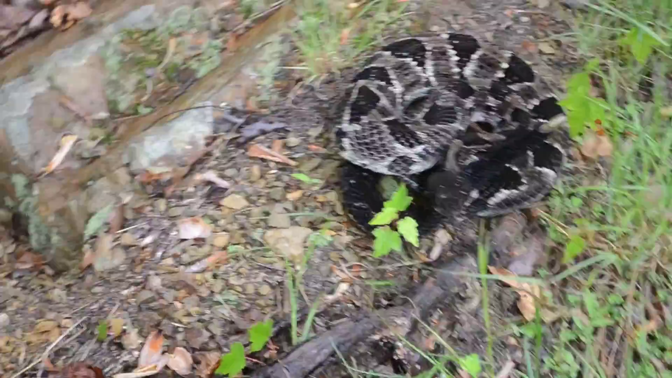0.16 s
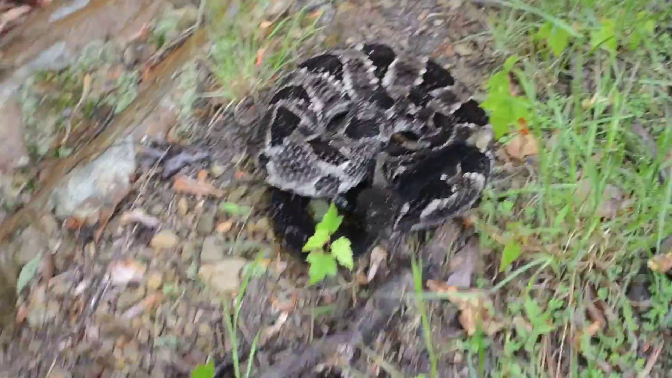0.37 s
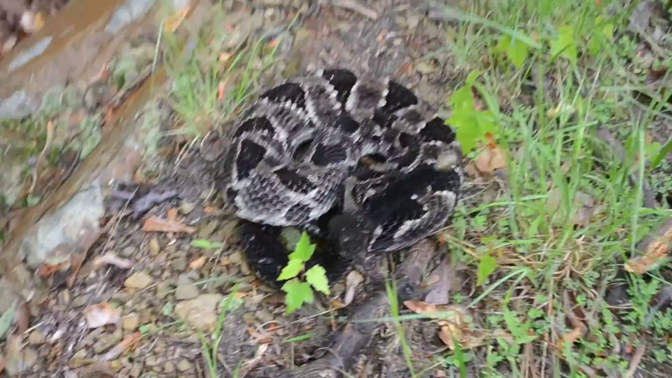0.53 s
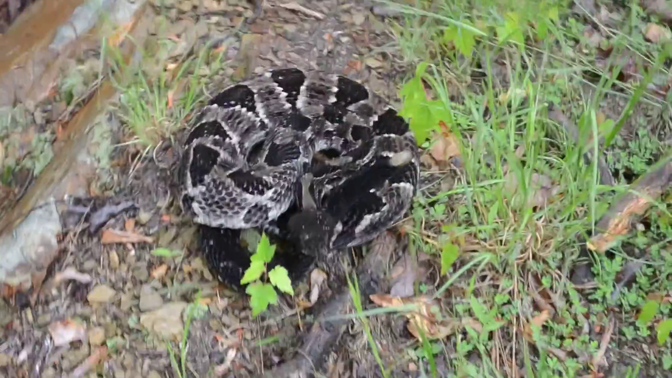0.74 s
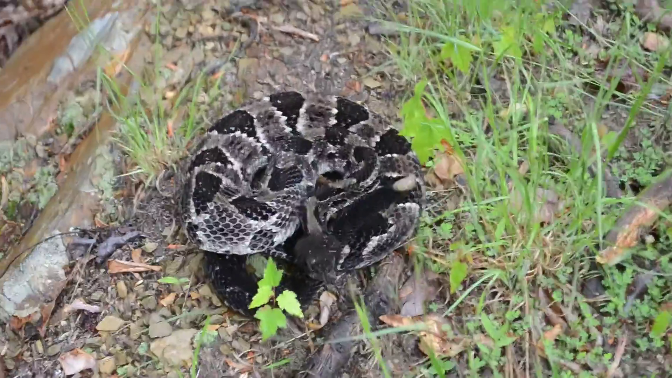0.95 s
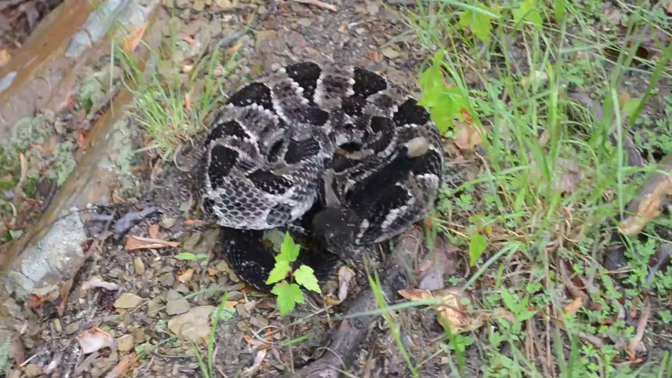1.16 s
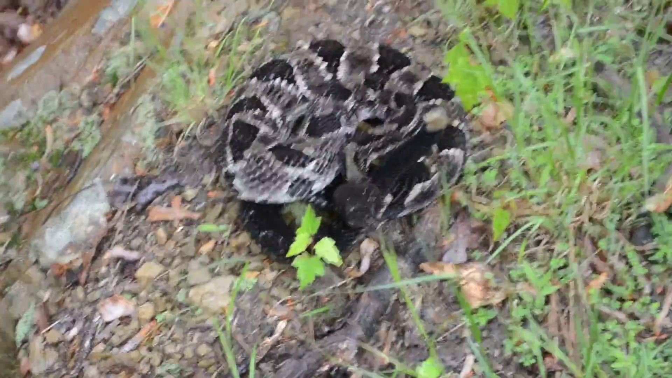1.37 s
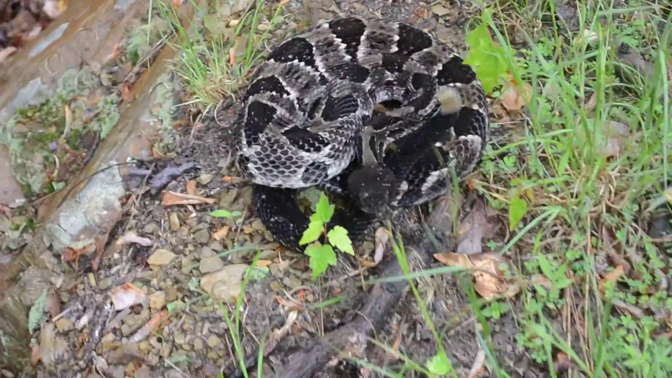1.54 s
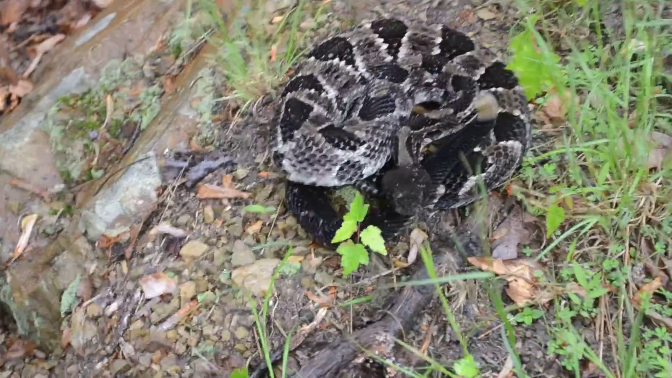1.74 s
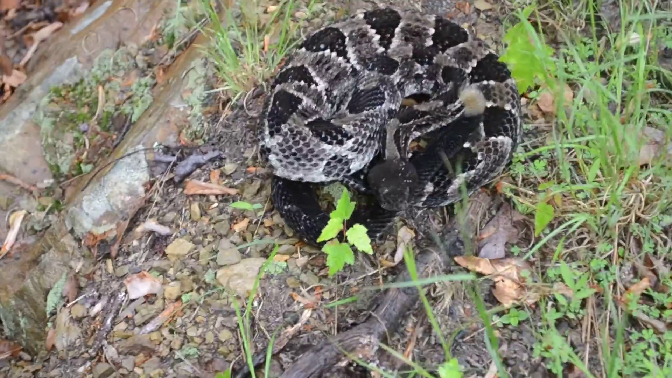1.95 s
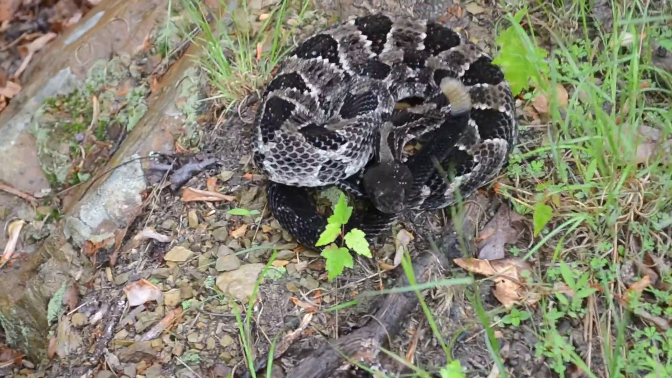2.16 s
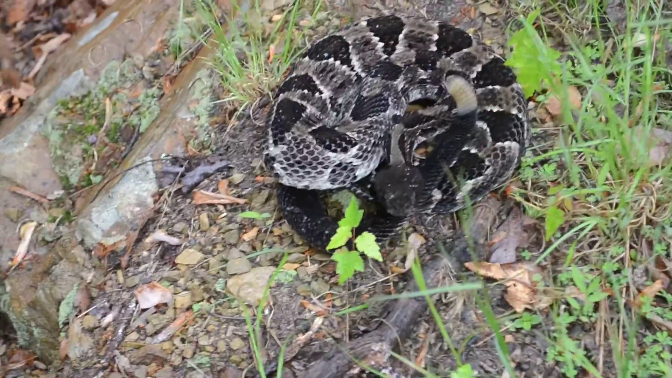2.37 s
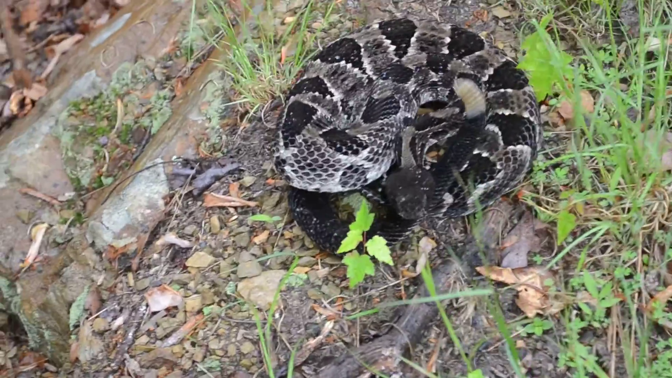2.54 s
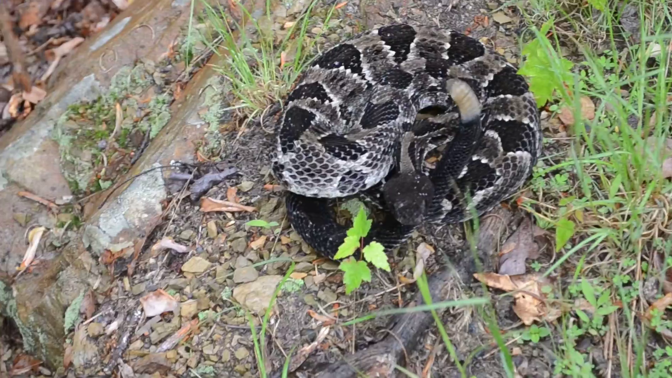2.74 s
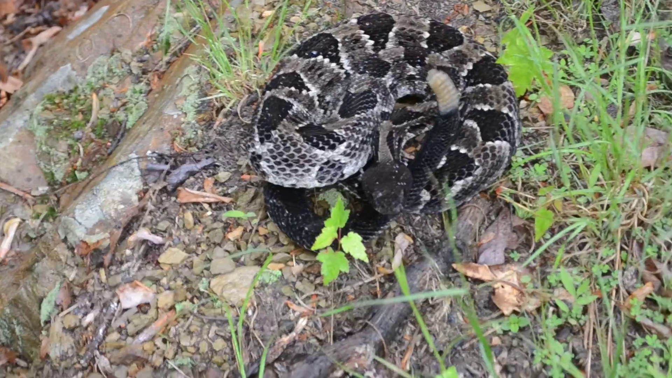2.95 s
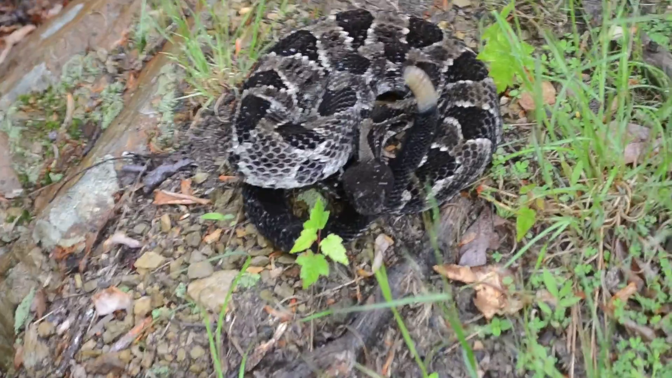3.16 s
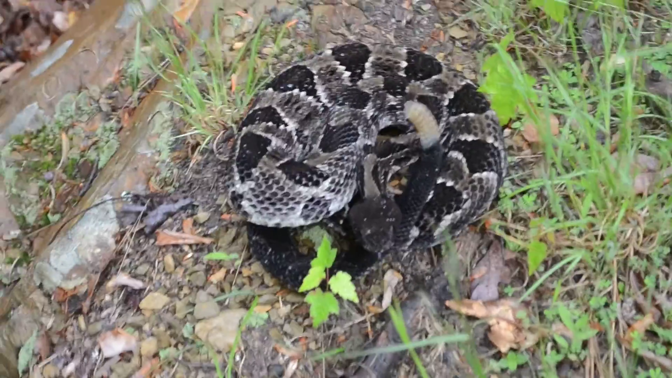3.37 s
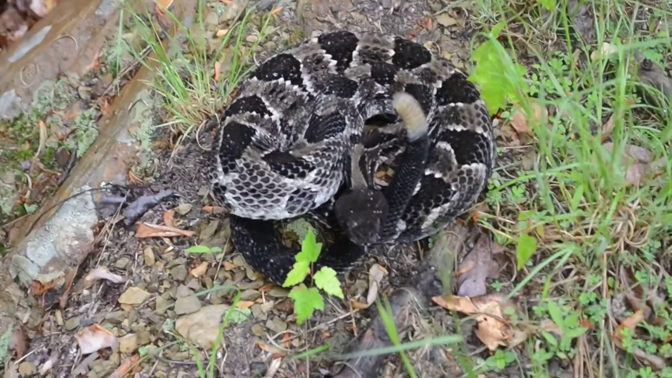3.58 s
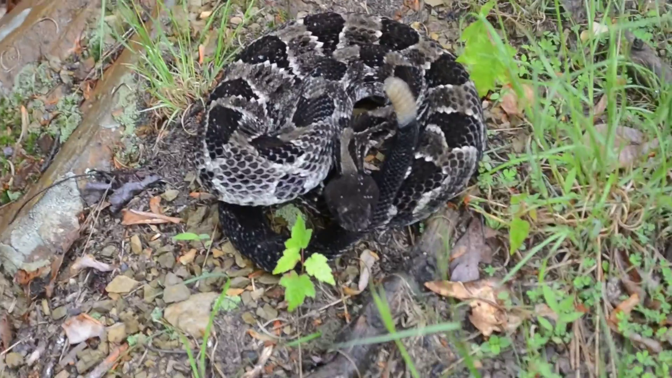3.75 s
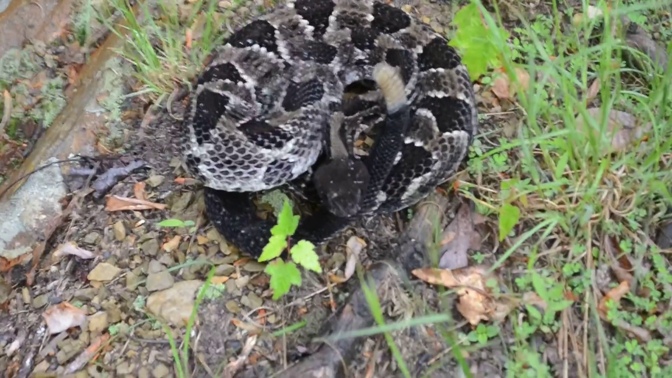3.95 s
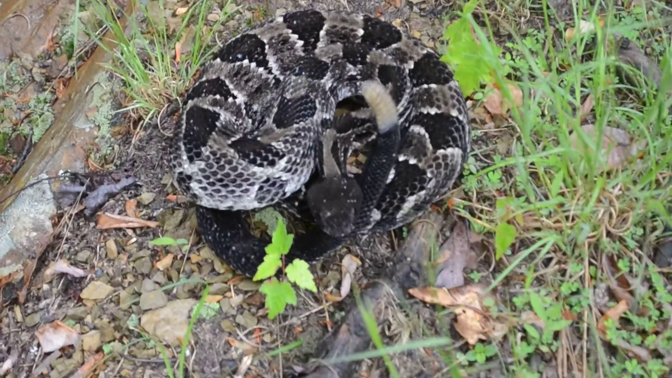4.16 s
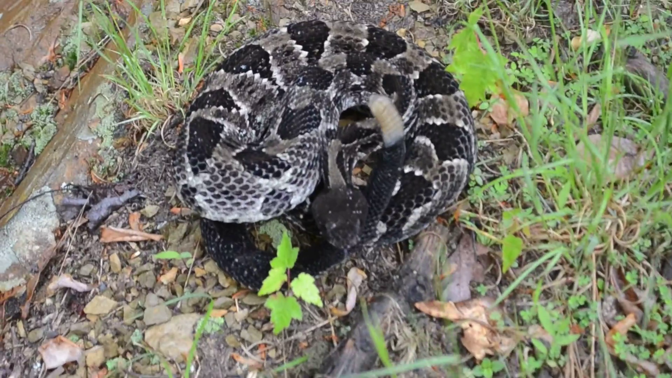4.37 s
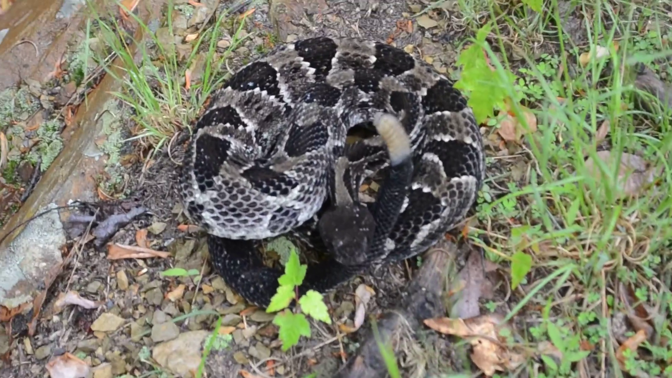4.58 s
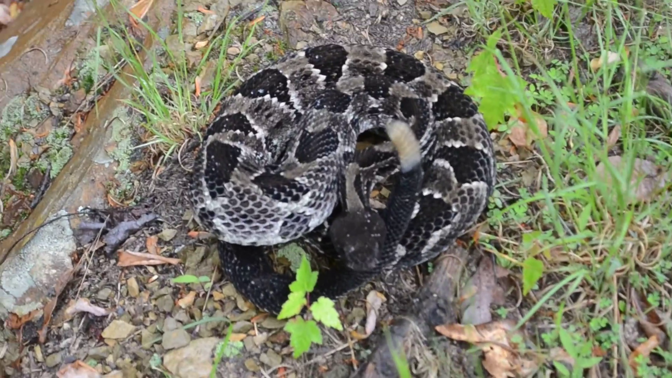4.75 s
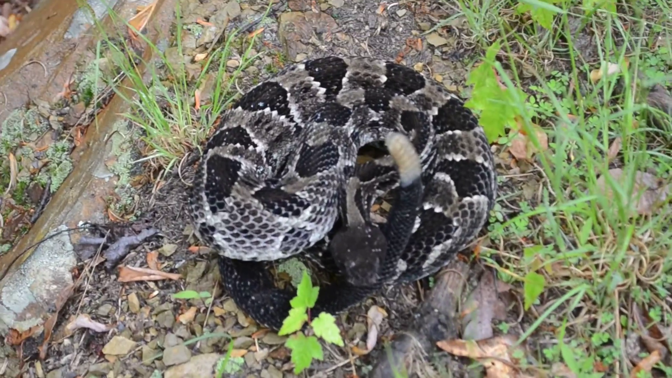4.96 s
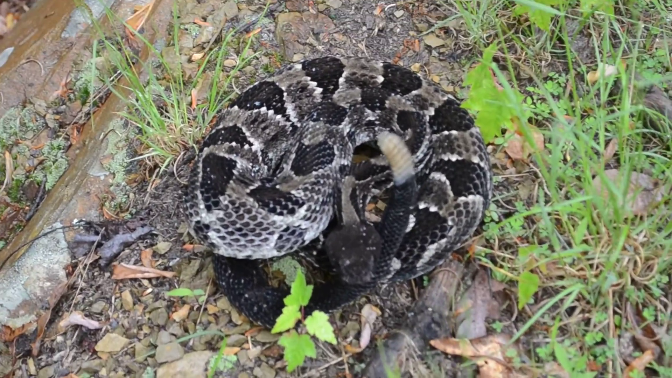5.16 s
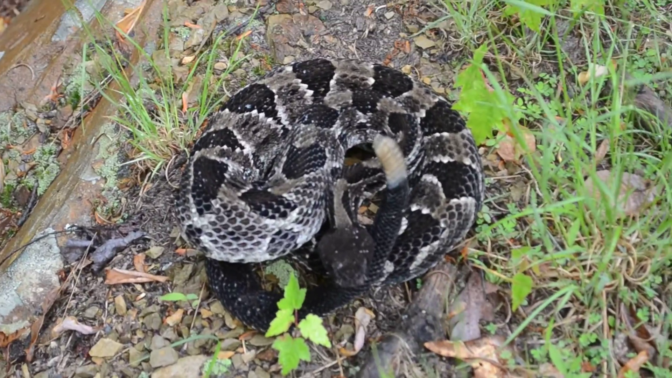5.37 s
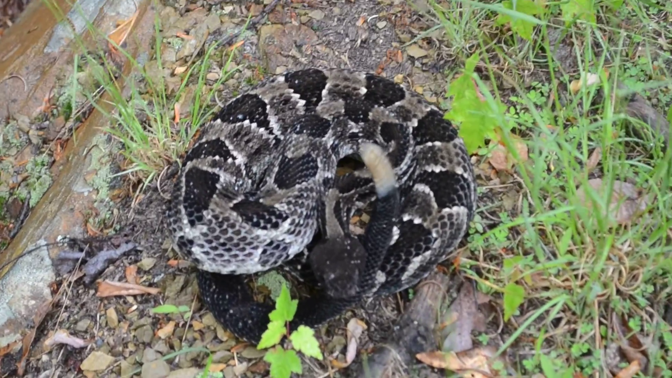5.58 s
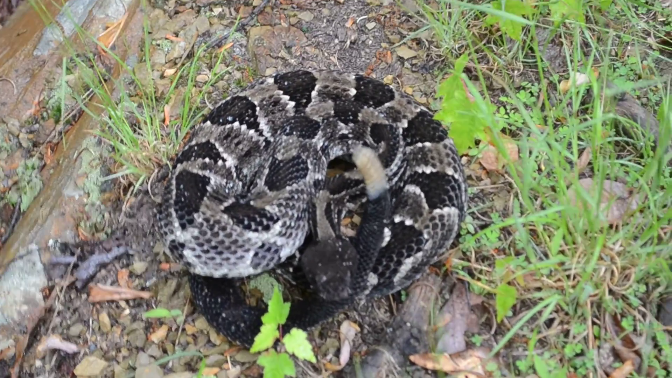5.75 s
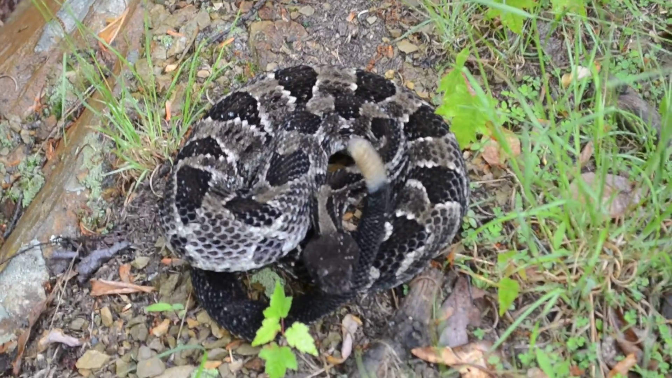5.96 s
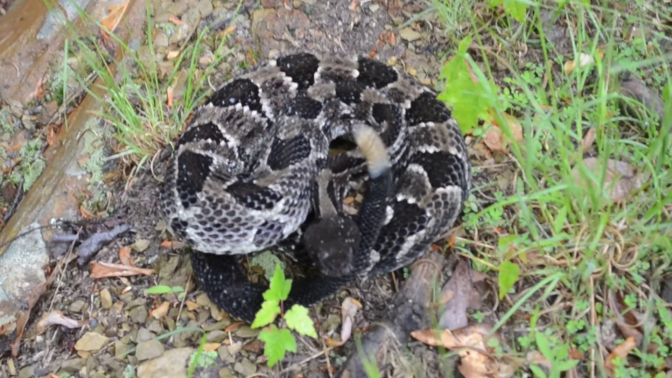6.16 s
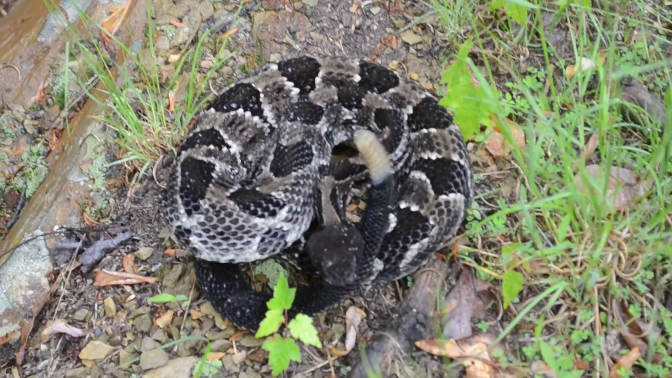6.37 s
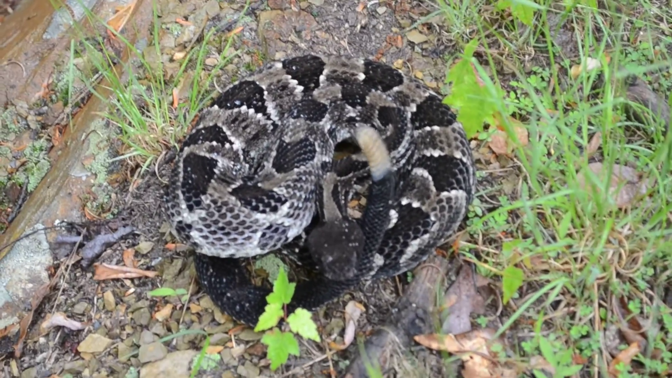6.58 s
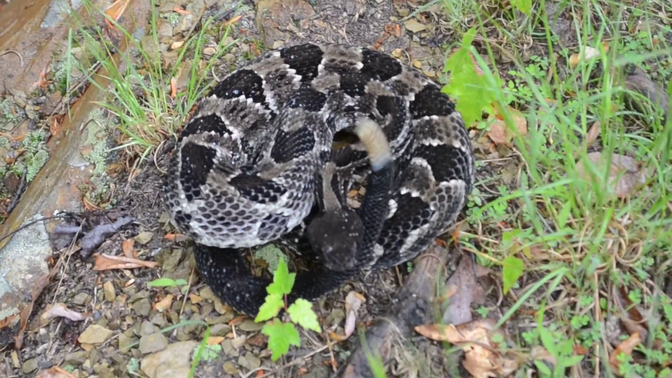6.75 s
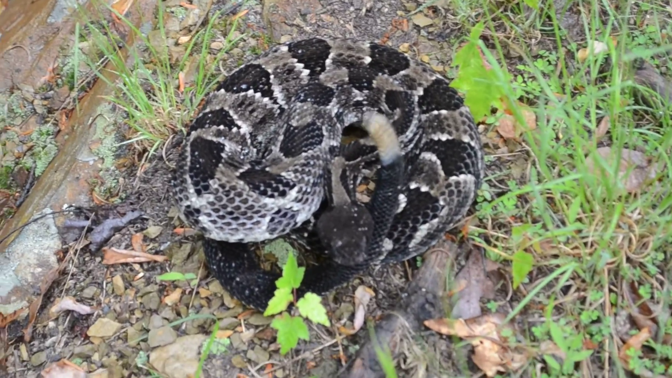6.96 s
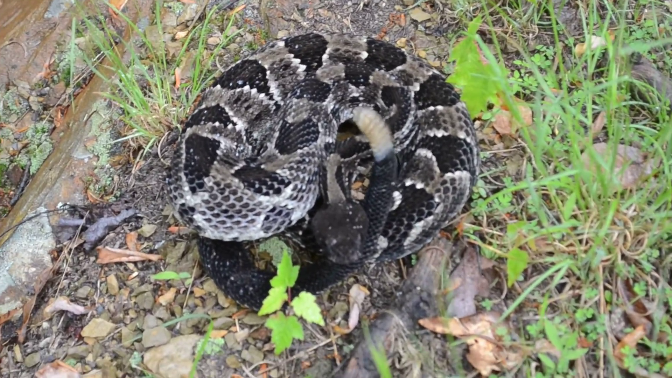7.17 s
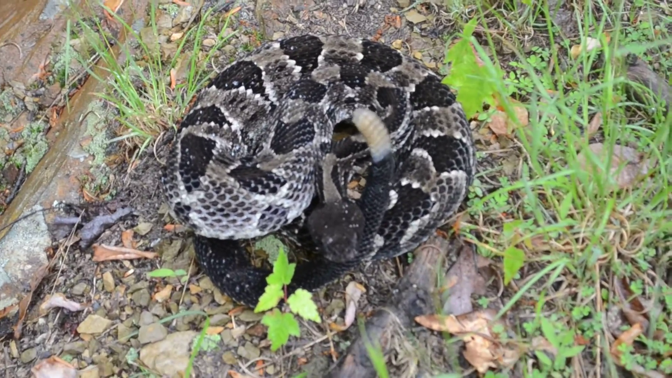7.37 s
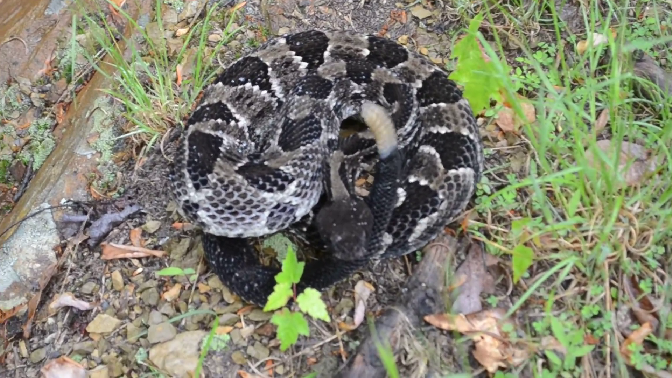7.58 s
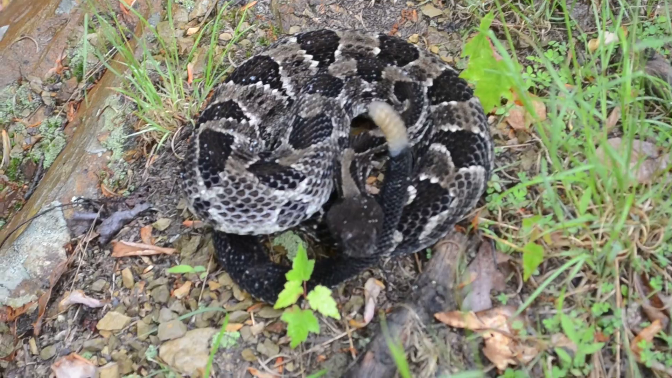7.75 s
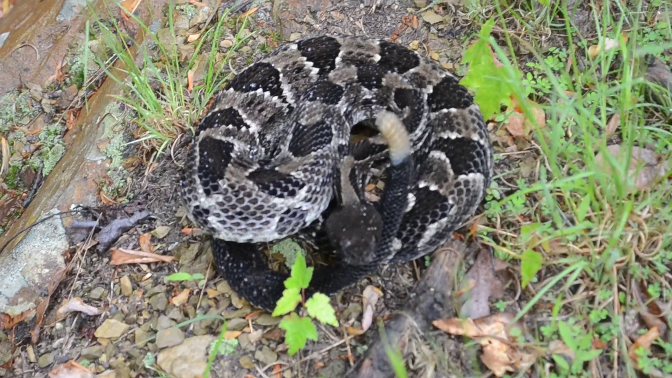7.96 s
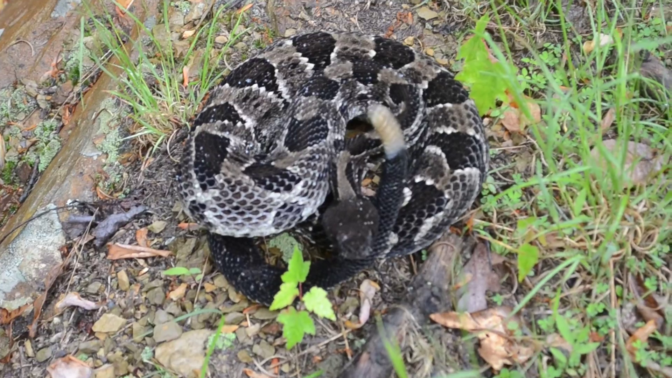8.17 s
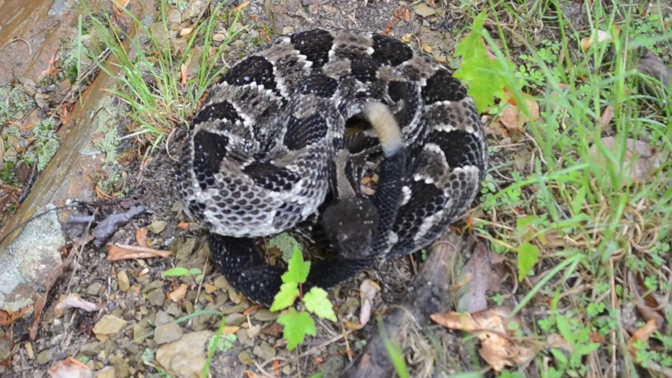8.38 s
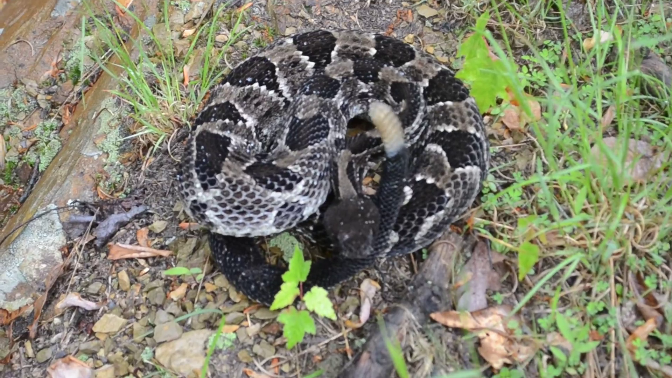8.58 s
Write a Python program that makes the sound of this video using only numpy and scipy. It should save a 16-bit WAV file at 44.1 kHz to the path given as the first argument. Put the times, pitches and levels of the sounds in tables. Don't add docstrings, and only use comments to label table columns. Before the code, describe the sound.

Close outdoor sound from a camera's own microphone: an unbroken rattlesnake buzz, bright and grainy, throbbing about a hundred times a second and slowing very slightly. Under it lie a faint low rustle, dull shoe scuffs on grit and tiny hollow handling knocks, mostly in the first four seconds and again near six. A thin motor hum comes and goes, and a weak low wind gust swells at the end.

```python
import sys
import numpy as np
from scipy import signal
from scipy.io import wavfile

SR = 44100
rng = np.random.default_rng(int(sys.argv[2]) if len(sys.argv) > 2 else 0)


def invert_db(level):
    return 10 ** (np.asarray(level, dtype=float) / 20)


def int16_out(signal):
    q = np.round(np.clip(np.atleast_2d(signal).T, -1, 1) * 32767)
    wavfile.write(sys.argv[1], SR, q.astype(np.int16))


N = 380141
STEP = 8


def in_time(rows):
    s, *columns = np.transpose(rows)
    return [np.interp(np.arange(N) / SR, s, c) for c in columns]


def at_hz(points, hz):
    f, *columns = np.transpose(points)
    return [np.interp(np.log(hz), np.log(f), c) for c in columns]


def rms_one(x):
    return x / np.sqrt(np.mean(x ** 2) + 1e-20)


def band(x, low_hz, high_hz, order=2):
    return signal.sosfilt(signal.butter(order, [low_hz, high_hz], "band", fs=SR, output="sos"), x)


def resonance(x, hz, width_hz):
    w, r = 2 * np.pi * hz / SR, np.exp(-np.pi * width_hz / SR)
    return signal.lfilter((1 - r * r) / 2 * np.array([1, 0, -1]), [1, -2 * r * np.cos(w), r * r], x)


def drift(rate_hz):
    r = np.exp(-80 * np.pi * rate_hz / SR)
    slow = signal.lfilter([1], [1, -2 * r, r * r], rng.standard_normal(N // 40 + 2002))[2000:]
    return np.interp(np.arange(N) / 40, np.arange(len(slow)), rms_one(slow))


def knocks(per_s, spread_db):
    sizes = invert_db(spread_db * np.minimum(rng.exponential(1, N), 3)) * rng.choice([-1, 1], N)
    return rms_one(sizes * (rng.random(N) < per_s / SR))


def swells(rows):
    t = np.arange(N) / SR
    return np.max([np.interp(t, [s, s + rise, s + rise + fall], [0, db, 0]) for s, rise, fall, db in rows], axis=0)


def shaped_noise(spectrum, patchy_db):
    out, white = 0, rng.standard_normal((2, N))
    octaves = np.log2(spectrum[-1][0] / spectrum[0][0])
    edges = spectrum[0][0] * 2 ** np.arange(0, octaves + .2, 1 / 3)
    for k, (low, high) in enumerate(zip(edges, edges[1:])):
        gain = invert_db(at_hz(spectrum, np.sqrt(low * high))[0] + patchy_db * drift(11))
        out = out + gain * band(white[k % 2], low, high)
    return rms_one(out)


# t/s, f/Hz [full swings per s]
TAIL_RATE = [
    (0.0, 54.03),
    (1.21, 51.39),
    (1.79, 51.62),
    (3.1, 49.88),
    (4.1, 50.86),
    (4.71, 50.14),
    (4.74, 49.39),
    (6.83, 47.44),
    (7.69, 47.61),
    (8.62, 46.56),
]
FIRST_PHASE = .22


def tail_swings():
    return FIRST_PHASE + np.cumsum(in_time(TAIL_RATE)[0])[::STEP] / SR


# f/Hz, throb depth/dB, hush after the turn/half swings,
# crest after the hush [0 to 1], fullness of the rise [-1 to 1]
HALF_SWING = [(1600, 3.6, .33, .63, -.4), (2500, 4.6, .36, .6, -.3), (3600, 3.0, .33, .77, -.2),
              (5000, 2.8, .31, .8, .1), (6700, 3.8, .34, .68, .4), (9300, 3.0, .4, .68, .4)]
# f/Hz, side-on level/dB, head-on level/dB, rebound level/dB
TWO_WAYS = [(1600, -2, 3.5, 0), (2500, -3.6, .7, .5), (3600, .2, .9, 2), (5000, -.3, -.8, 3),
            (6700, .3, 1.5, 1), (9300, 0, -.3, 0)]


def throb_db(hz, swings, facing, rebound):
    depth_db, hush, crest, full = at_hz(HALF_SWING, hz)
    side_db, head_db, rebound_db = at_hz(TWO_WAYS, hz)
    since_hush = (2 * swings - hush - .055 * (1 - facing)) % 1
    depth_db = depth_db * (1 + .38 * (1 - facing))
    stroke_db = depth_db * np.interp(since_hush, [0, crest / 2, crest, 1], [-1, full, 1, -1])
    one_sided_db = (side_db + (head_db - side_db) * facing) * np.cos(2 * np.pi * swings)
    return stroke_db + one_sided_db + rebound_db * rebound


# t/s, level/dB, facing [0 side-on to 1 head-on]
APPROACH = [(0, -38, 0.28), (.05, -41.5, 0), (.13, -39, 0), (.24, -38.5, 0), (.32, -37, 0.026),
            (1.4, -35.5, 0.2), (2.75, -35.5, 0.4), (3.3, -34.7, 0.64), (3.75, -34, 0.65),
            (3.9, -33.5, 0.65), (5.7, -33.5, 0.91), (8.62, -33.5, 0.85)]
# f/Hz, level/dB per Hz
SIDE_ON = [(1100, -25), (1700, -17), (2100, -12.5), (2600, -2.5), (3250, -3.5), (3800, 2.5), (4900, -1),
           (5700, -6.5), (6700, -8), (7400, -11.5), (9200, -8.5), (10200, -14), (11000, -22.5),
           (11700, -62)]
# f/Hz, level/dB per Hz
HEAD_ON = [(1100, -34), (1500, -23.5), (2000, -14), (2800, -13), (4100, -7.5), (4600, -5), (5100, 1),
           (5400, -3.5), (5800, -12.5), (7200, -11), (9000, -14), (10400, -21), (11100, -29.5),
           (11700, -78)]
# f/Hz, width/Hz, level/dB
STONE_ECHO_DIPS = [(3324, 190, -6), (4500, 270, -1), (6590, 350, -5.5)]
DULL_START_DB, WAKE_S, TREBLE_DB, TREBLE_DB_PER_S = -4, 0.25, -0.82, 0.18
PEAK_SLIDE = 0.048


def rattle():
    level_db, facing = (c[::STEP] for c in in_time(APPROACH))
    t = np.arange(0, N, STEP) / SR
    bright_db = DULL_START_DB * np.exp(-t / WAKE_S) + TREBLE_DB + TREBLE_DB_PER_S * t
    swings = tail_swings()
    half = (2 * swings - .33).astype(int)
    rebound = sum(np.exp(-((swings % 1 - at) / .03) ** 2) for at in (.235, .87))
    whole_tail = knocks(4000, spread_db=3.5)
    segments = [knocks(8000, spread_db=4.5) for _ in range(4)]
    force_db = 0.08 * rng.standard_normal(half[-1] + 1)[half]
    ticks = t * 600
    clumps = [np.interp(ticks, np.arange(len(c)), c) for c in rng.standard_normal((6, int(ticks[-1]) + 2))]
    out, power = np.zeros(N), 0
    for k, hz in enumerate(range(1150, 11800, 330)):
        part_db = 0.08 * rng.standard_normal(half[-1] + 1)[half]
        throb = invert_db(throb_db(hz, swings, facing, rebound) + 1.2 * clumps[k // 6] + force_db + part_db)
        near_peak = np.exp(-(np.log(hz / 5200) / 0.28) ** 2)
        slid_hz = hz * (1 + PEAK_SLIDE * (1 - facing) * near_peak)
        side_db, head_db = at_hz(SIDE_ON, hz)[0], at_hz(HEAD_ON, slid_hz)[0]
        tilt_db = bright_db * max(np.log2(hz / 4000), 0)
        colour = invert_db((1 - facing) * side_db + facing * head_db + tilt_db)
        half_width_hz = 165 * 1.06
        ringing = band(0.56 * whole_tail + segments[k % 4], hz - half_width_hz, hz + half_width_hz)
        out += ringing * np.repeat(rms_one(throb) * colour, STEP)[:N] * (-1) ** k
        power += colour ** 2
    for hz, width_hz, dip_db in STONE_ECHO_DIPS:
        out -= np.repeat(1 - facing, STEP)[:N] * (1 - invert_db(dip_db)) * resonance(out, hz, width_hz)
    even = rms_one(out / np.repeat(np.sqrt(power), STEP)[:N])
    return np.repeat(invert_db(level_db), STEP)[:N] * even


# f/Hz, level/dB per Hz
WIND = [(12, -51), (20, -21), (97, 2), (118, 1), (177, -16), (260, -3.5), (340, -30), (570, -120)]
# t/s [start], rise/s, fall/s, level/dB [over the calm]
GUSTS = [
    (-.1, 0.14, .45, 8),
    (.62, .07, 0.1, 5),
    (1.9, 0.83, 2.5, 6),
    (5.7, 0.13, .4, 7),
    (6.2, .3, .5, 6),
    (7.75, .12, 0.57, 10),
    (8.02, 0.12, 0.34, 14.5),
    (8.1, .25, 0.6, 15.5),
]
CALM_DB = -76.5


def wind():
    return invert_db(CALM_DB + swells(GUSTS)) * shaped_noise(WIND, patchy_db=2.5)


# f/Hz, level/dB per Hz
RUSTLE = [(130, -1.5), (200, -5.5), (400, -1), (600, -0.5), (900, -1), (1400, -2)]
GROUND_DB, SETTLE_DB_PER_S = -62.5, -0.2541


def rustle():
    level_db = GROUND_DB + SETTLE_DB_PER_S * np.arange(N) / SR
    return invert_db(level_db) * shaped_noise(RUSTLE, patchy_db=0.5)


# t/s, peak level/dB, f/Hz, knock level/dB [over the ring]
TAPS = [(0.174, -46.5, 410, 9), (0.349, -47, 660, 2), (0.556, -41.5, 1210, 1), (0.717, -47, 660, 3),
        (1.325, -50, 480, -4), (1.37, -50, 560, -3), (1.409, -48, 640, -2), (1.531, -44, 493, -1),
        (1.606, -45, 487, -2), (1.645, -43, 480, -3), (1.719, -53, 1004, 3), (1.76, -51, 480, -2),
        (3.154, -46, 641, 3), (3.16, -39, 1020, -3), (3.178, -47, 350, 3), (3.23, -46, 633, 3),
        (3.285, -49, 1060, 5), (3.542, -38, 990, 4), (3.789, -47, 1110, 2), (5.496, -43, 1300, 2),
        (5.684, -46, 336, -2), (5.724, -50, 404, -2), (5.767, -43, 700, -2), (5.772, -45, 317, -5),
        (8.043, -47, 850, 1), (8.596, -48, 458, -1)]


def taps():
    out, t = np.zeros(N + 2000), np.arange(2000) / SR
    knock = band(np.exp(-t / .0001), 460, 1400)
    knock = knock / np.abs(knock).max()
    for s, peak_db, hz, knock_db in TAPS:
        decay = invert_db(-20 * t * hz / 7.0)
        ring = np.sin(2 * np.pi * hz * t) * decay * np.minimum(t / 0.0011, 1)
        at = round(s * SR)
        out[at:at + 2000] += invert_db(peak_db - 4) * (ring + invert_db(knock_db) * knock)
    return out[:N]


# t/s [start], t/s [end], level/dB
MOTOR = [(.27, 0.653, -69.5), (1.83, 1.978, -67), (2.437, 2.94, -74), (3.016, 3.212, -67.5),
         (3.403, 3.478, -64), (3.6, 3.994, -68), (4.203, 4.553, -67), (4.592, 5.197, -73),
         (5.548, 5.81, -66), (6.109, 6.6, -68.5), (6.871, 7.146, -67), (7.302, 7.717, -67),
         (7.96, 8.2, -67), (8.37, 8.702, -67.5)]
# t/s [start], t/s [end], f/Hz, level/dB
SLOW_HUM = (4, 4.5, 496, -73)
MOTOR_HZ, WARMING_HZ_PER_S = 650, 3.0


def lens_motor():
    out, waver = np.zeros(N), 2.82 * np.cumsum(drift(7.3)) / SR
    bursts = [(start, end, MOTOR_HZ + WARMING_HZ_PER_S * start, db) for start, end, db in MOTOR]
    for start, end, hz, level_db in bursts + [SLOW_HUM]:
        at = slice(round(start * SR), min(round(end * SR), N))
        t = np.arange(at.start, at.stop) / SR
        gate = np.clip(np.minimum(t - start, end - t) / 0.028, 0, 1)
        out[at] += invert_db(level_db) * gate * np.sqrt(2) * np.sin(2 * np.pi * (hz * t + waver[at]))
    return out * invert_db(0.54 * drift(14))


# t/s [start], rise/s, fall/s, level/dB [over rest]
SCUFFS = [
    (.62, .07, .06, 12),
    (.9, .22, .1, 8),
    (1.2, 0.37, .2, 15),
    (3.05, 0.087, .25, 13),
    (3.48, 0.041, 0.11, 14),
    (5.64, 0.067, 0.22, 17),
    (7.8, 0.29, .12, 14),
    (8.45, .15, .1, 17),
]
SCUFF_DB, SCUFF_HZ = -78, (275, 646)


def scuffs():
    return invert_db(SCUFF_DB + swells(SCUFFS)) * rms_one(band(knocks(900, spread_db=3.5), *SCUFF_HZ))


def scene():
    return (rattle() + wind() + rustle() + taps() + lens_motor() + scuffs())[None]


def band_limit(x):
    return signal.sosfilt(signal.butter(12, 13480, fs=SR, output="sos"), x)


# f/Hz, width/Hz, level/dB
PORT_NOTCH = (7870, 590, -6.5)
STORED_HZ, MIRROR_DB = 24000, -4


def record(dry):
    hz, width_hz, dip_db = PORT_NOTCH
    x = dry - (1 - invert_db(dip_db)) * resonance(dry, hz, width_hz)
    x = signal.sosfilt(signal.ellip(8, .5, 50, 11650, fs=SR, output="sos"), x)
    carrier = np.cos(2 * np.pi * STORED_HZ * np.arange(N) / SR)
    mirrored = band(x, 10300, 11900, order=4) * carrier
    mirrored = band(mirrored, 12000, 14000, order=4)
    mirrored = signal.sosfilt(signal.butter(24, 12600, fs=SR, output="sos"), mirrored)
    return band_limit(x + invert_db(MIRROR_DB) * mirrored)


dry = scene()
out = record(dry)
int16_out(out)
```